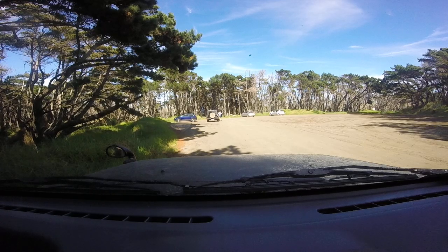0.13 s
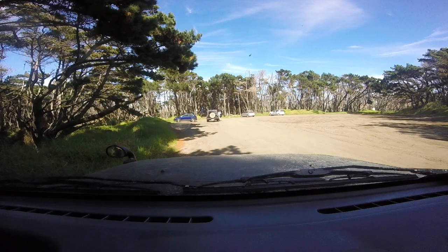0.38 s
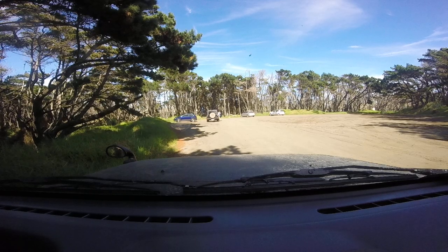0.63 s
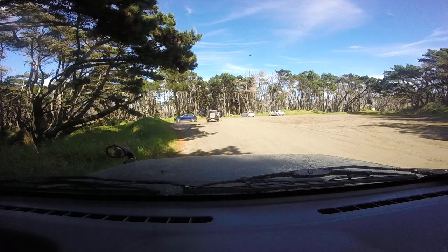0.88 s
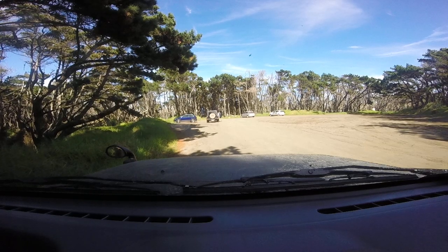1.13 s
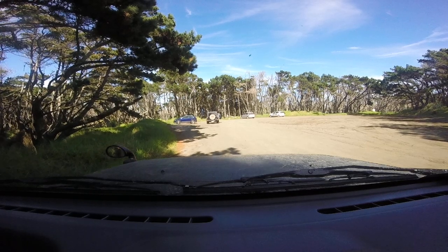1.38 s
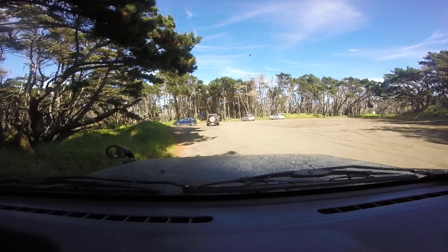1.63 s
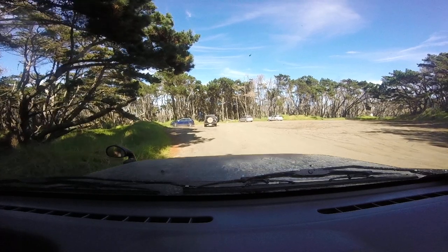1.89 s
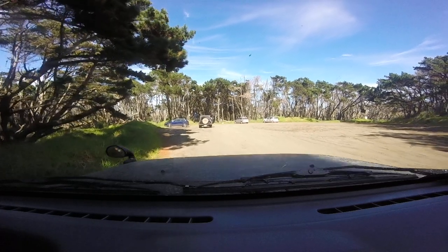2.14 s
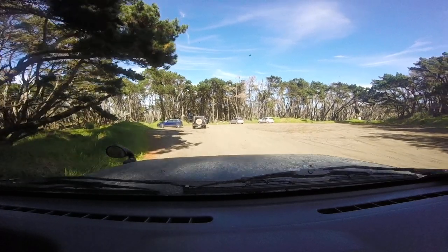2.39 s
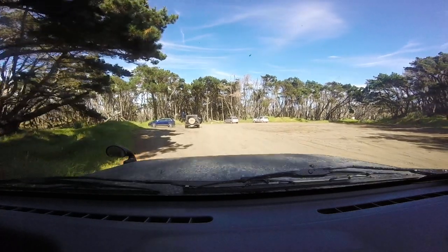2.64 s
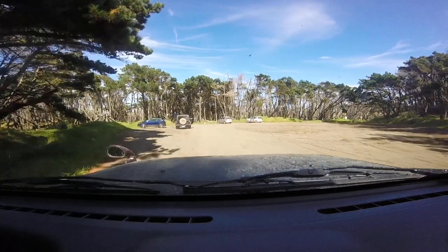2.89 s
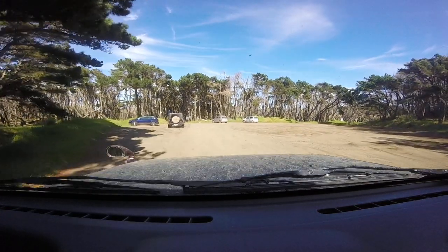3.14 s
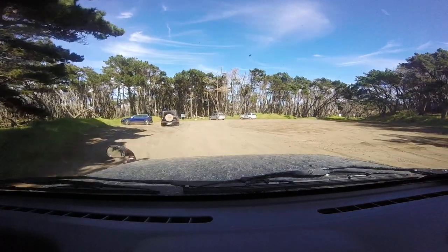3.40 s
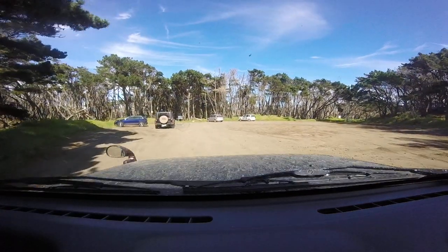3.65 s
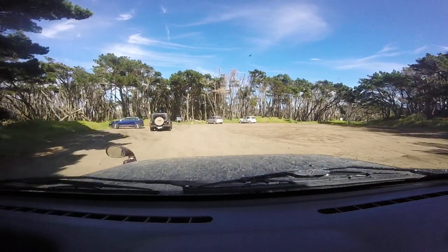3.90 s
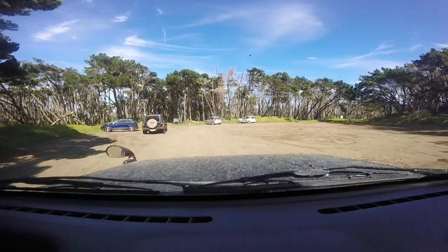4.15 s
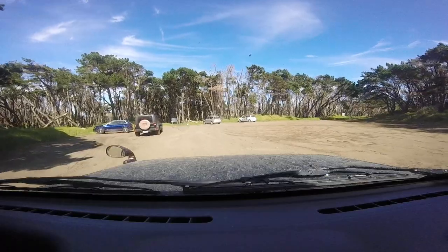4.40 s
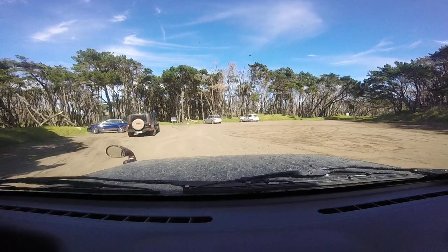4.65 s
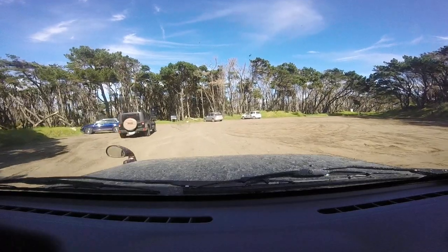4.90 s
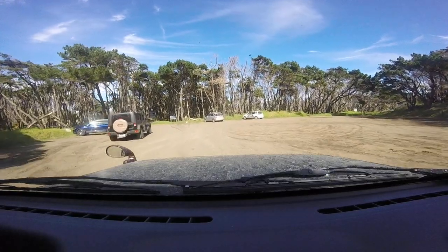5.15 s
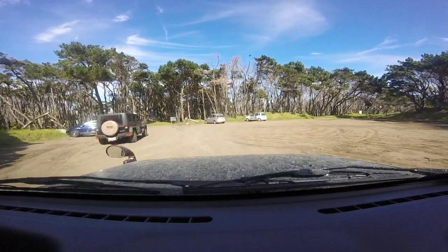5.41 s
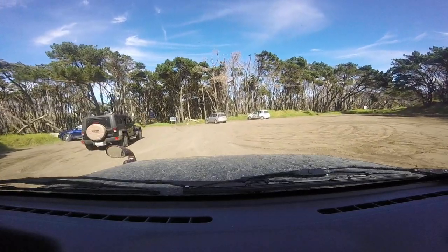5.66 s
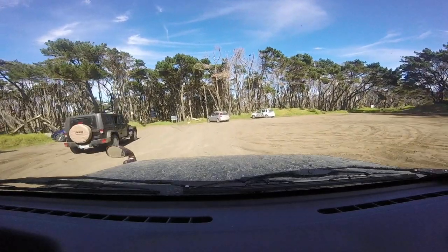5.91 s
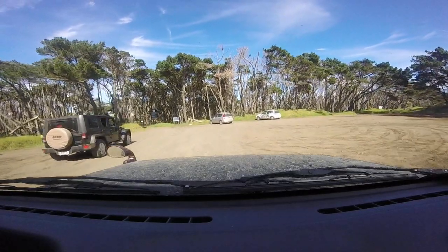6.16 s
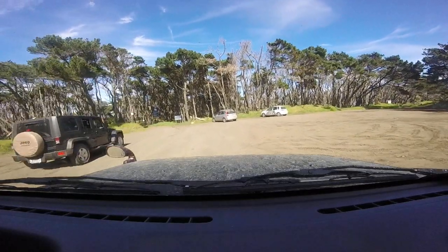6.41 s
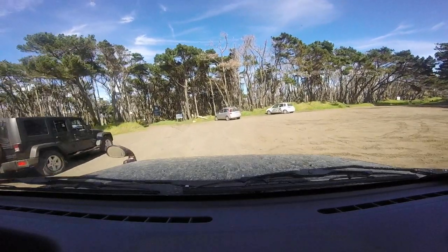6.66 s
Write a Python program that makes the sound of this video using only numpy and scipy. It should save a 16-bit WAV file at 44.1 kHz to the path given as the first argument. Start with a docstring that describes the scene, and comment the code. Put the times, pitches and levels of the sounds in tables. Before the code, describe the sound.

Heard from the cabin, an engine hums and revs while tyres crunch across gravel, the body booms and stones ping and knock underneath.

```python
"""Inside a car that pulls away over gravel, heard in a camera housing fixed behind the windscreen.
The engine hums and revs three times: sines at multiples of its firing rate, coloured by the cabin.
The tyres shake the body into a low boom and thuds: a wandering sine and bands of noise that swell.
Gravel is a dense hail of short ringing grains over a droning noise; stones ping and knock on struck
modes, loose trim rattles, a few squeaks slide upward, and a faint steady hiss lies under all."""
import sys
import numpy as np
from scipy import signal
from scipy.fft import rfft, irfft
from scipy.io import wavfile
from scipy.ndimage import uniform_filter1d

SR = 44100
rng = np.random.default_rng(int(sys.argv[2]) if len(sys.argv) > 2 else 0)


def put_to_file(sound):
    """Save the sound as 16-bit audio at rate SR, in the file named by the first command-line argument."""
    columns = np.atleast_2d(sound).T  # one column per channel
    safe = np.clip(columns, -1, 1)
    whole_steps = np.round(safe * 32767)
    wavfile.write(sys.argv[1], SR, whole_steps.astype(np.int16))


def invert_db(x):
    """Field ratio 10**(x/20) for x, a level in decibels (scalar or array-like)."""
    u = np.asarray(x, float) / 20
    return 10 ** u


N = 299439


def rms_one(x):
    """Scale to rms 1."""
    return x / np.sqrt(np.mean(x ** 2) + 1e-20)


def in_time(rows):
    """Draw each column after the time as a curve, one value a sample."""
    s, *columns = np.transpose(rows)
    return [np.interp(np.arange(N) / SR, s, column) for column in columns]


def at_hz(points, hz):
    """Read a spectrum [dB] on a log-frequency axis."""
    point_hz, point_db = np.array(points).T[:2]
    return np.interp(np.log(hz), np.log(point_hz), point_db)


def drift(rate_hz):
    """Slow chance of spread 1: noise at SR / 40 through a double one-pole low-pass."""
    pole = np.exp(-80 * np.pi * rate_hz / SR)
    noise = rng.standard_normal(N // 40 + 2002)
    slow = signal.lfilter([1], [1, -2 * pole, pole * pole], noise)[2000:]  # skip the filter's start
    return np.interp(np.arange(N) / 40, np.arange(len(slow)), rms_one(slow))


def ring(clicks, hz, t60):
    """A two-pole resonator: a unit click sets a sine of height 1 ringing, 60 dB down after t60 seconds."""
    r = np.exp(-np.log(1000) / (t60 * SR))
    w = 2 * np.pi * hz / SR
    return signal.lfilter([0, np.sin(w)], [1, -2 * r * np.cos(w), r * r], clicks + 1e-18)


def coloured(gain_of_hz):
    """Steady noise of a given spectrum, rms 1."""
    hz = np.maximum(np.arange(N // 2 + 1) * SR / N, 1)
    return rms_one(irfft(rfft(rng.standard_normal(N)) * gain_of_hz(hz), N))


def closed(spectrum, fall_db):
    """Gain by frequency, falling by fall_db an octave beyond both ends."""
    low, high = spectrum[0][0], spectrum[-1][0]

    def gain(hz):
        octaves_out = np.log2(np.maximum(np.maximum(low / hz, hz / high), 1))
        return invert_db(at_hz(spectrum, hz) - fall_db * octaves_out)
    return gain


def shaken(resonances):
    """Noise through steep resonances, each (pitch [Hz], width [Hz], level [dB])."""
    def gain(hz):
        return sum(invert_db(db) / (1 + (2 * (hz - mid_hz) / width) ** 2) for mid_hz, width, db in resonances)
    return coloured(gain)


def evened(x, seconds, share):
    """Take out a share of the chance swells of narrow noise."""
    level = np.sqrt(uniform_filter1d(x ** 2, int(seconds * SR)) + 0.0092)
    return rms_one(x / level ** np.clip(share, 0, 1))


def touches(s, db, length, fade_db, count, first_db):
    """Spread each event into uneven touches that fade over its length; the first gets first_db extra."""
    when = rng.random((len(s), count)) * (np.arange(count) > 0)  # share of the length, the first at 0
    at_s = s[:, None] + when * np.abs(length)[:, None]
    touch_db = first_db * (when == 0) - fade_db * when
    return at_s.ravel(), np.repeat(db, count, axis=0) + touch_db.reshape(-1, 1)


def strike(at_s, db, modes, spread_db, rise_cycles):
    """Blows (db: blows x modes) strike each mode with a chance strength; the ring swells over some cycles."""
    at = np.minimum((np.asarray(at_s) * SR).astype(int), N - 1)
    db = db + spread_db * rng.standard_normal((len(at), len(modes)))
    out = np.zeros(N)
    for k, (hz, level_db, t60) in enumerate(modes):
        blows = np.bincount(at, invert_db(db[:, k] + level_db), N)
        contact = ring(blows, hz, rise_cycles / hz)
        out += ring(contact, hz, t60) * 14 * hz / (rise_cycles * SR)  # a slower rise builds up more
    return out


# spectrum of the hiss: (pitch [Hz], density [dB per Hz])
HISS_SPECTRUM = [(250, -2), (500, -4), (1000, -9.5), (2000, -13.5), (3200, -17), (4000, -19.5),
                 (6300, -23.5), (8000, -27), (10000, -30.5), (12500, -36), (15000, -49.5)]


def hiss():
    """Steady noise that falls toward the treble."""
    return invert_db(-58) * coloured(closed(HISS_SPECTRUM, fall_db=21.0))


# faint squeaks: (time [s], level [dB], pitch at the middle [Hz], length [s])
SQUEAK_EVENTS = [(3.65, -58, 2732, 0.016), (3.67, -64, 3020, 0.014), (4.31, -66, 2520, 0.015),
                 (5.508, -55, 2803, 0.011)]


def squeaks():
    """Each squeak is a short thin sine that slides upward under a bell-shaped swell."""
    rise_hz_per_s = 5000.
    out = np.zeros(N)
    for s, db, hz, length in SQUEAK_EVENTS:
        t = np.arange(N) / SR - s
        turns = hz * t + .5 * rise_hz_per_s * t ** 2
        out += invert_db(db) * np.exp(-4 * (t / length) ** 2) * np.sin(2 * np.pi * turns)
    return out


# jolts that rattle the trim: (time [s], level [dB])
RATTLE_EVENTS = [(1.001, -44), (1.8575, -35.5), (1.936, -50), (3.9926, -40.5), (4.922, -45), (5.012, -42.5),
                 (5.2735, -39), (5.83, -46), (5.858, -44), (5.881, -44), (5.9128, -39)]
# the trim buzzes on: (time [s], level [dB], length [s])
SHUDDER_EVENTS = [(1.032, -52.5, 0.097), (1.879, -50, 0.073), (5.301, -41.5, 0.089), (5.404, -44.5, 0.097),
                  (5.816, -47, 0.07), (5.876, -41.5, 0.085)]
# trim modes: (pitch [Hz], level [dB], t60 in a rattle [s], lag before the jolt reaches that part [s])
TRIM_MODES = [(1510, -2, .05, .007), (1950, -2, .045, .001), (2220, -2, .035, .004), (2390, -3, .035, .004),
              (2700, -6, .025, .002), (2920, -1, .026, 0), (3170, 0, .034, .007), (6100, -17, .04, .006),
              (6450, -16, .025, .001), (7600, -17, .015, 0)]
# how a buzz wakes each of the seven lower trim modes: level [dB]
BUZZ_LEVELS = [-9, 0, 2.5, -3.5, 5, 2.5, 1]


def trim():
    """A rattle is a jolt that runs through loose plastic parts one after another, then a few weak touches;
    a shudder is a long run of touches that leaves the top modes asleep."""
    s, db = np.transpose(RATTLE_EVENTS)
    rattle_s = np.full(len(s), 0.03)
    at_s, db = touches(s, db[:, None] - 16.5, rattle_s, fade_db=12.5, count=4, first_db=9.0)
    rattles = np.zeros(N)
    for *mode, lag_s in TRIM_MODES:
        rattles += strike(at_s + lag_s, db, [mode], spread_db=3.0, rise_cycles=12.0)

    s, db, length = np.transpose(SHUDDER_EVENTS)
    at_s, db = touches(s, db[:, None] - 16.0, length, fade_db=6.0, count=50, first_db=-3.0)
    # parts in steady contact ring for a shorter time: 0.6 of the t60
    buzz_modes = np.array(TRIM_MODES)[:7, :3] * [1, 1, 0.6]
    return rattles + strike(at_s, db + BUZZ_LEVELS, buzz_modes, spread_db=5.0, rise_cycles=6.0)


# spectrum of a stone's crack: (pitch [Hz], density [dB per Hz])
CRACK_SPECTRUM = [(5500, -8.5), (7000, 2.5), (9000, 4), (11000, -5.5), (13500, -12.5)]


def crack(at_s, db, t60):
    """A bright puff of noise at each blow, dying fast."""
    blows = np.bincount((at_s * SR).astype(int), invert_db(db), N)
    decay = np.exp(-np.log(1000) / (t60 * SR))
    dying = signal.lfilter([1], [1, -decay], blows + 1e-18)
    return dying * coloured(closed(CRACK_SPECTRUM, fall_db=24.5))


# stones on a thin panel: (time [s], level [dB], crack against the ping [dB])
PING_EVENTS = [(2.7013, -41.5, -3), (2.8848, -37, -3), (3.2504, -39.5, -1), (3.7487, -36, -0.5),
               (5.2164, -43, 0.5), (5.5418, -37.5, -3), (5.9992, -38, -1), (6.7406, -28, 2)]
# modes of the thin panel: (pitch [Hz], level [dB], t60 [s])
PANEL_MODES = [(2205, -1.5, 0.027), (2500, -1.5, 0.03), (2700, -11, 0.016), (3600, -26, 0.02),
               (4004, -18.5, 0.018), (6400, -28, 0.025)]
# stones on the wheel arch: (time [s], level [dB], sharpness [dB]; below 0 it dulls the upper modes)
KNOCK_EVENTS = [(2.9706, -38.5, -14), (3.5252, -37.5, -4.5), (3.9564, -34.5, -5), (4.0552, -36, -11),
                (4.277, -41.5, -3), (4.398, -40, -12), (4.5871, -34.5, -11), (4.672, -48, -3),
                (4.6883, -41, -35), (4.7595, -32.5, 3), (4.85, -44, 0), (4.9116, -30, -6.5),
                (4.957, -47, -7), (5.002, -36, 1), (5.0516, -34, 3), (5.1173, -32.5, -12), (5.411, -41, -6),
                (5.419, -34, -4), (5.432, -42, 7), (5.4664, -40, 7), (5.5572, -36, 0), (5.6138, -34.5, 1),
                (5.6456, -39.5, -7), (5.7132, -26, -4.5), (5.7938, -37.5, -5), (5.821, -44, -12),
                (6.14, -43, 0), (6.165, -38.5, 0), (6.1877, -35, -19), (6.2099, -32, -20), (6.326, -42, -2),
                (6.4112, -31.5, -24), (6.5, -42, -7), (6.602, -50, 1), (6.626, -37.5, -11),
                (6.6511, -33, -18), (6.697, -36, -8), (6.771, -40, -3)]
# modes of the wheel arch: (pitch [Hz], level [dB], t60 [s])
ARCH_MODES = [(656, -7.5, 0.012), (950, -8, 0.025), (1120, -12.5, 0.0059), (1312, 2.5, 0.034),
              (1473, 2, 0.035), (1659.8, -3.5, 0.025), (1840, 3, 0.022), (2180, 4.5, 0.015),
              (2520, 1.5, 0.022), (2996, 1, 0.021)]


def stones():
    """Pings ring clean on the panel; knocks scuff the arch, and a sharper one wakes its upper modes."""
    s, db, crack_db = np.transpose(PING_EVENTS)
    high = np.array(PANEL_MODES)[:, 0] > 3000
    # a harder stone wakes the high panel modes more, counted from -36 dB
    ping_db = db[:, None] + 0.7 * (db[:, None] + 36) * high
    pings = strike(s, ping_db, PANEL_MODES, spread_db=1.5, rise_cycles=14.0)
    pings += crack(s - .0012, db + crack_db - 22.5, t60=0.05)

    s, db, sharp_db = np.transpose(KNOCK_EVENTS)
    upper = np.array(ARCH_MODES)[:, 0] > 1900
    knock_db = db[:, None] - 21.0 + np.minimum(sharp_db, 0)[:, None] * upper
    scuff_s = np.full(len(s), 0.007)
    at_s, knock_db = touches(s, knock_db, scuff_s, fade_db=10.0, count=4, first_db=5.0)
    return pings + strike(at_s, knock_db, ARCH_MODES, spread_db=1.5, rise_cycles=1.5)


# gravel under the tyres: (time [s], coarse crunch level [dB], fine crunch level [dB])
GRAVEL_LEVELS = [(0.0, -87, -99), (0.72, -79, -89), (1.27, -68, -71.5), (1.85, -61.5, -71.5),
                 (2.65, -61.5, -70.5), (3.4, -68, -69.5), (4.05, -60, -65.5), (4.52, -66.5, -71),
                 (4.97, -59, -67.5), (5.25, -61, -66), (5.41, -58.5, -63), (5.55, -60, -66),
                 (5.99, -59, -60), (6.2, -60.5, -66.5), (6.47, -60, -63.5), (6.79, -51.5, -53.5)]
# weight of the grains by pitch: (pitch [Hz], level [dB])
CRUNCH_SPECTRUM = [(900, -23.5), (1300, 3.5), (1600, 1), (2000, 5.5), (2500, -10), (3100, -0.5),
                   (3600, -13.5), (6500, -35.5)]
# spectrum of the tread's drone: (pitch [Hz], density [dB per Hz])
DRONE_SPECTRUM = [(120, -27.5), (200, 2.5), (311, 2), (362, 3), (583, -10), (934, -24.5), (1100, -31),
                  (1430, -43), (2420, -120)]


def gravel(per_s, size_db, cycles):
    """Stones crack in clumps and ring some cycles, coarse ones low and fine ones high;
    the tread drones through the floor, growing with revs and shaking."""
    coarse_db, fine_db = in_time(GRAVEL_LEVELS)
    firing_hz = np.maximum(in_time(ENGINE_REVS)[0], 62)
    shake_db = in_time(ROAD_SHAKE)[1]
    # -56.5 dB at 70 Hz firing and -30 dB shake
    drone_db = -56.5 + 0.21 * (firing_hz - 70) + 0.46 * (shake_db + 30)

    sizes = invert_db(size_db * np.minimum(rng.exponential(1, N), 5)) * rng.choice([-1, 1], N)
    born = rng.random(N) < per_s * invert_db(3.0 * drift(14.0)) / SR  # the drift makes the clumps
    pitches_hz = np.geomspace(900, 6500, 24)
    dealt = rng.integers(0, 24, N)  # which pitch each stone gets
    grains = []
    for k, hz in enumerate(pitches_hz):
        contact = ring(sizes * born * (dealt == k), hz, 2 / hz)
        grains.append(invert_db(at_hz(CRUNCH_SPECTRUM, hz)) * ring(contact, hz, cycles / hz) * hz)
    coarse, fine = rms_one(sum(grains[:11])), rms_one(sum(grains[11:]))
    drone = coloured(closed(DRONE_SPECTRUM, fall_db=16.0)) * invert_db(0.5 * drift(27.0))
    return invert_db(coarse_db) * coarse + invert_db(fine_db) * fine + invert_db(drone_db) * drone


# how each part follows the shaking: part: (level at a shake of -30 dB [dB],
# slope [dB per dB of shake], chance flutter [dB], flutter rate [Hz])
PART_FOLLOWS = {"boom": (-33, 1.0, 4.5, 14.5), "springs": (-40.5, 0.32, 3.5, 1.5),
                "floor": (-53, 0.2, 4.5, 17), "dashboard": (-54.5, 0.5, 3.5, 8)}


def swelling(part, s, db, length):
    """Gain of one part: it follows the shaking, flutters by chance and swells smoothly around each event."""
    level_db, follows, flutter_db, flutter_hz = PART_FOLLOWS[part]
    shake_db = in_time(ROAD_SHAKE)[1]
    power = invert_db(level_db + follows * (shake_db + 30) + flutter_db * drift(flutter_hz)) ** 2
    t = np.arange(0, N + 64, 64)[:, None] / SR  # one point every 64 samples
    swells = np.sum(invert_db(db) ** 2 * np.exp(-8 * ((t - s) / length) ** 2), axis=1)
    return np.sqrt(power + np.interp(np.arange(N) / SR, t[:, 0], swells))


# the body shaken by the road, harder as the car gathers speed:
# (time [s], boom pitch [Hz], shake level [dB])
ROAD_SHAKE = [(0.0, 64, -52), (1.2, 63.1, -42.5), (1.53, 59.34, -31), (1.7, 54.45, -35.5),
              (2.0, 45.2, -33.5), (2.3, 45.78, -31.5), (2.45, 51.94, -29.5), (2.88, 50.48, -29),
              (3.05, 60.47, -29), (3.4, 62.58, -27), (3.75, 54.34, -25), (4.1, 51.93, -29),
              (4.27, 57.5, -24.5), (4.4, 49.4, -25), (4.85, 48.56, -27), (5.02, 53.44, -18.5),
              (5.15, 48.25, -28), (5.4, 47.71, -19.5), (5.56, 57, -22.5), (5.72, 49.55, -16.5),
              (6.2, 46.78, -25.5), (6.5, 41.72, -16), (6.7, 45.26, -21.5), (6.79, 47.15, -19)]
# the boom swells, most of them over bumps: (time [s], level [dB], length [s])
BOOM_SWELLS = [(0.573, -31.5, 0.056), (1.065, -35, 0.037), (1.496, -18, 0.076), (2.393, -22.5, 0.11),
               (2.668, -27, 0.21), (2.865, -22.5, 0.1), (3.079, -22, 0.061), (3.333, -26, 0.048),
               (3.65, -28, 0.042), (3.75, -19.5, 0.059), (3.992, -26, 0.058), (4.258, -20.5, 0.1),
               (4.492, -21, 0.069), (4.647, -22, 0.13), (4.749, -20.5, 0.071), (4.849, -16, 0.055),
               (4.913, -13.5, 0.075), (5.043, -17.5, 0.03), (5.122, -16, 0.041), (5.206, -15, 0.036),
               (5.258, -18.5, 0.04), (5.367, -21, 0.054), (5.448, -23, 0.1), (5.573, -24, 0.063),
               (5.698, -14, 0.09), (5.85, -17.5, .12), (6.007, -25, 0.037), (6.078, -17.5, 0.036),
               (6.198, -12.5, 0.088), (6.35, -14, 0.056), (6.427, -14, 0.071), (6.577, -18, 0.055),
               (6.735, -11, 0.064)]
# the springs lurch: (time [s], level [dB], length [s])
SPRING_LURCHES = [(1.146, -35, 0.05), (1.54, -52, 0.11), (1.918, -46, 0.09), (2.517, -28, 0.11),
                  (3.135, -32, 0.091), (3.68, -34, 0.092), (4.15, -39, 0.11), (4.376, -28, 0.16),
                  (5.112, -23, 0.31), (5.762, -17.5, 0.071), (5.93, -24, 0.071), (6.19, -38, 0.097),
                  (6.513, -33.5, 0.13)]
# thuds through the structure: (time [s], floor level [dB], dashboard level [dB], length [s])
BODY_THUDS = [(0.352, -41, -44, 0.046), (0.418, -46, -43.5, 0.097), (0.498, -45, -44.5, 0.13),
              (0.878, -39, -42.5, 0.05), (0.918, -45, -44, 0.05), (0.956, -38, -46, 0.036),
              (1.057, -34.5, -51, 0.067), (1.208, -37, -51.5, 0.023), (1.385, -44, -43, 0.036),
              (1.65, -53, -47, 0.12), (2.52, -49, -50.5, 0.074), (3.012, -55, -43.5, 0.14),
              (3.17, -35, -55, 0.076), (3.602, -24, -59, 0.022), (3.663, -28, -67, 0.071),
              (4.062, -34.5, -49, 0.087), (4.329, -29.5, -56, 0.09), (4.696, -41, -45, .05),
              (4.78, -34, -46, 0.046), (4.871, -26.5, -42, 0.064), (5.001, -29.5, -51, 0.053),
              (5.097, -29, -44.5, 0.073), (5.2, -30, -44, 0.14), (5.29, -31, -48, 0.046),
              (5.446, -32, -56, 0.056), (5.722, -26.5, -43.5, 0.082), (5.813, -44, -50, 0.045),
              (5.92, -36, -57, 0.066), (6.067, -40, -58, 0.048), (6.17, -39, -50, 0.045),
              (6.281, -27.5, -53.5, 0.086), (6.386, -36, -40, 0.034), (6.556, -44, -51, 0.057),
              (6.654, -28, -40, 0.057), (6.718, -42, -43, 0.047)]
# resonances of the floor (first three) and the dashboard (last two): (pitch [Hz], width [Hz], level [dB])
FLOOR_AND_DASH = [(80, 20, -3), (110, 22, 0), (135, 20, -5), (162, 18, 0), (220, 60, -20)]
# jolts in the suspension: (time [s], level [dB])
CLUNK_EVENTS = [(4.271, -40), (5.117, -35), (5.711, -42.5), (6.657, -38)]
# modes of the suspension strut: (pitch [Hz], level [dB], t60 [s])
STRUT_MODES = [(241, -1, 0.093), (329, 6.5, 0.05), (388, 5, 0.072), (492, -8, 0.026), (500, -5, 0.039)]


def body():
    """The lowest body mode booms at a wandering pitch; the springs heave below it, floor and dashboard
    thud above, and the suspension clunks on struck modes."""
    boom_hz = in_time(ROAD_SHAKE)[0] * (1 + 0.0538 * drift(11.51))
    mode = np.sqrt(2) * np.sin(2 * np.pi * np.cumsum(boom_hz) / SR)
    blur = coloured(closed([(40, -1.0), (52, -2.0), (66, 0.5)], fall_db=25.0))
    boom = evened(mode + invert_db(-4.0) * blur, seconds=0.026, share=0.23)
    boom *= swelling("boom", *np.transpose(BOOM_SWELLS))

    heave = coloured(closed([(15, 7.5), (21, -6.5), (26, -1.5)], fall_db=33.5))
    heave = evened(heave, seconds=0.12, share=0.12) * swelling("springs", *np.transpose(SPRING_LURCHES))

    floor = evened(shaken(FLOOR_AND_DASH[:3]), seconds=0.067, share=0.62)
    dash = evened(shaken(FLOOR_AND_DASH[3:]), seconds=0.077, share=0.3)
    s, floor_db, dash_db, length = np.transpose(BODY_THUDS)
    thuds = floor * swelling("floor", s, floor_db, length)
    thuds += dash * swelling("dashboard", s, dash_db, length)

    s, db = np.transpose(CLUNK_EVENTS)
    clunks = strike(s, db[:, None] - 6.5, STRUT_MODES, spread_db=3.0, rise_cycles=4.0)
    return boom + heave + thuds + clunks


# the engine's revs: (time [s], firing rate [Hz], load level [dB])
ENGINE_REVS = [(0, 32.8, -57), (1.15, 32.5, -55), (1.3, 34.4, -45), (1.39, 46.5, -43), (1.444, 59.2, -36),
               (1.51, 71.5, -34), (1.58, 78.5, -33), (1.634, 82.3, -27), (1.756, 88, -24.5),
               (1.88, 90.6, -26.5), (2.414, 93.2, -25.5), (2.63, 91.2, -28.5), (2.76, 86, -29.5),
               (3.02, 77.3, -36), (3.132, 73.2, -31), (3.33, 68.93, -28.5), (3.54, 61.93, -33),
               (3.7, 69, -33), (3.82, 79.4, -30), (3.93, 86.9, -26), (4.03, 88.1, -27), (4.118, 84.6, -32),
               (4.288, 75.7, -33), (4.54, 69.17, -28), (4.8, 63.66, -30.5), (5.3, 61.55, -42.5),
               (5.78, 64, -30), (5.902, 73.1, -31), (6.038, 81.8, -29), (6.144, 81.5, -32),
               (6.22, 76.4, -34), (6.4, 71, -32), (6.79, 65.92, -27.5)]
# engine orders: (multiple of the firing rate, level [dB])
ENGINE_ORDERS = [(.25, -24), (.5, -10), (.75, -22), (1.5, -32), (4, -36), (4.5, -35), (5, -42), (5.5, -56),
                 (6, -59), (1, 0), (2, -20), (3, -33)]
# how the cabin passes engine tones: (pitch [Hz], gain [dB])
CABIN_GAIN = [(15, -1), (33, 2.5), (45, -9), (60, 3), (100, 0), (150, 1), (190, 2.5), (210, -8), (226, 8),
              (246, 11), (263, 6), (272, -7), (285, -16), (320, -6), (395, -3), (430, 4.5), (460, 8.5),
              (520, 19), (600, 17.5)]


def engine(lope_share):
    """Orders of the firing rate as sines coloured by the cabin; uneven cylinders give the fractional orders,
    those below one following the load only in part; the highest waver and slip in phase until they blur."""
    firing_hz, load_db = in_time(ENGINE_REVS)
    turns = np.cumsum(firing_hz * (1 + .001 * drift(8.0))) / SR
    peak_db = load_db.max()
    lope_db = peak_db + lope_share * (load_db - peak_db)
    out = np.zeros(N)
    for multiple, level_db in ENGINE_ORDERS:
        upper = multiple > 3
        waver_db = 2.5 * drift(9.0) if upper else 1.1 * drift(7.0)
        if multiple < 1:
            drive_db = lope_db + 2.5 * drift(5.0)
        elif multiple == 3:  # follows a quarter of the load's swing
            drive_db = peak_db + .25 * (load_db - peak_db) + waver_db
        else:
            drive_db = load_db + waver_db
        if multiple == 2:  # leads near idle: gains 1.5 dB per Hz below 65 Hz, at most 28 dB
            drive_db = drive_db + np.clip(1.5 * (65 - firing_hz), 0, 28) + 1.5 * drift(10.0)
        slip_turns = upper * 0.085 * drift(9.0)
        gain = invert_db(drive_db + level_db + at_hz(CABIN_GAIN, multiple * firing_hz))
        phase_turns = multiple * turns + slip_turns + rng.random()
        out += np.sqrt(2) * gain * np.sin(2 * np.pi * phase_turns)
    return out


def scene():
    """All sources meet at one microphone."""
    tyres = gravel(per_s=3500., size_db=3.6, cycles=13.)
    mix = hiss() + squeaks() + trim() + stones() + tyres + body() + engine(lope_share=0.9)
    return mix[None]


def band_limit(x):
    """A steep low-pass at the top of the band."""
    return signal.sosfilt(signal.butter(12, 15700, fs=SR, output="sos"), x)


def record(dry):
    """The finished mix goes out at the level it was built."""
    return band_limit(dry)


dry = scene()
out = record(dry)
put_to_file(out)
```